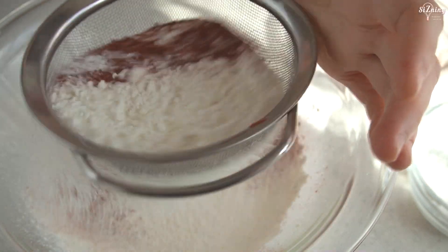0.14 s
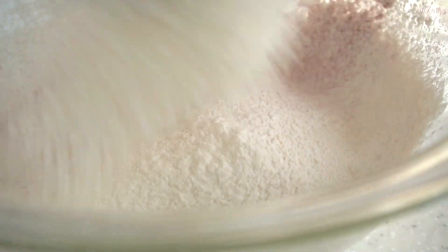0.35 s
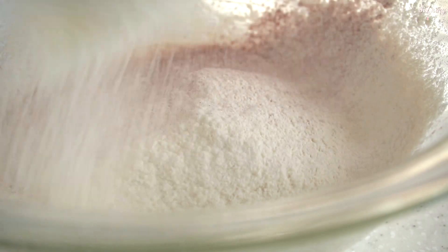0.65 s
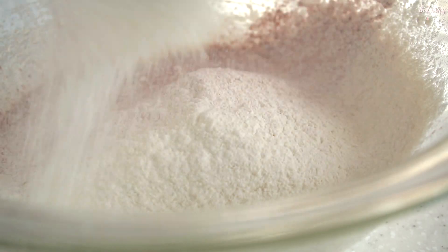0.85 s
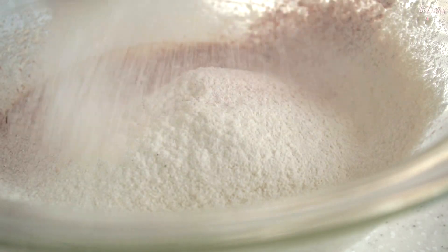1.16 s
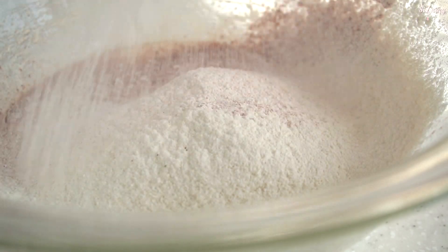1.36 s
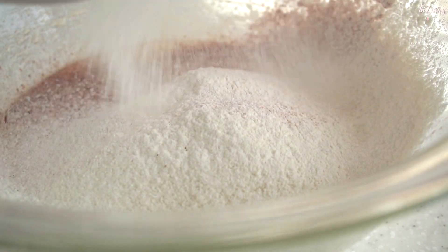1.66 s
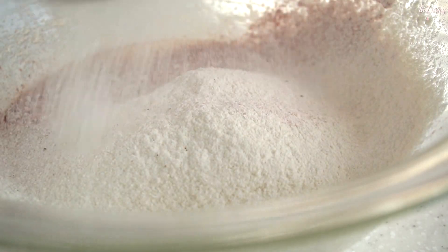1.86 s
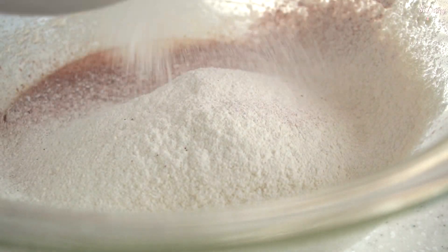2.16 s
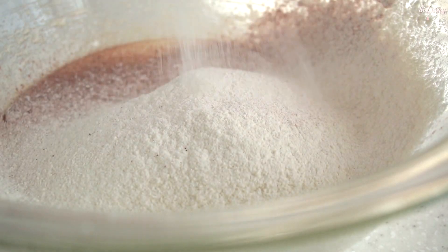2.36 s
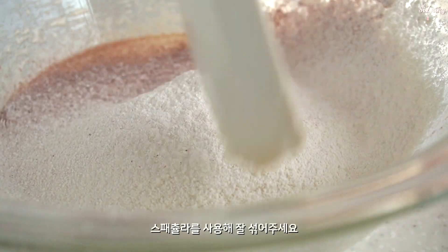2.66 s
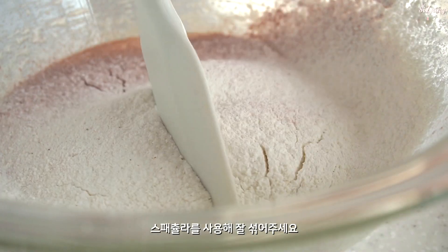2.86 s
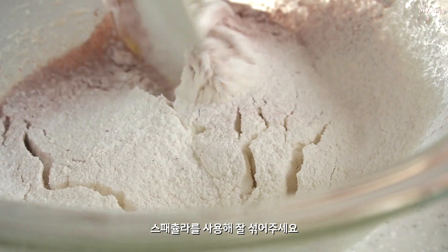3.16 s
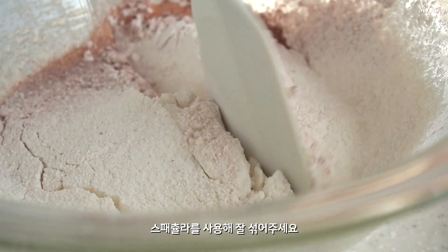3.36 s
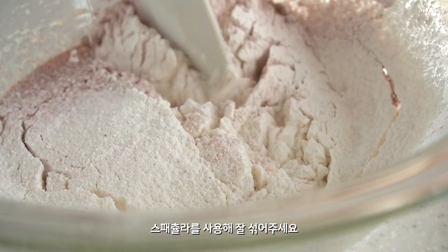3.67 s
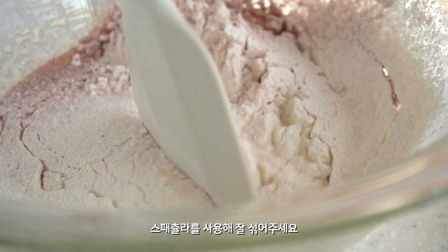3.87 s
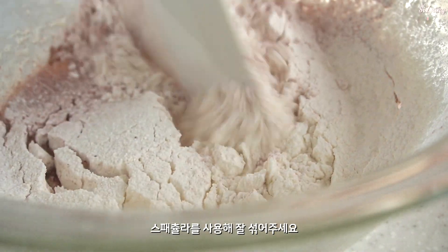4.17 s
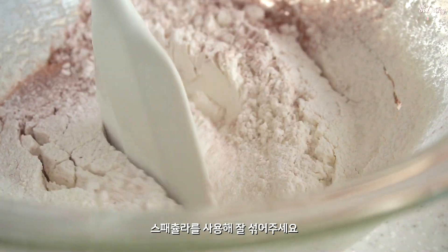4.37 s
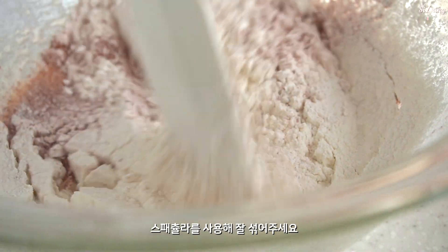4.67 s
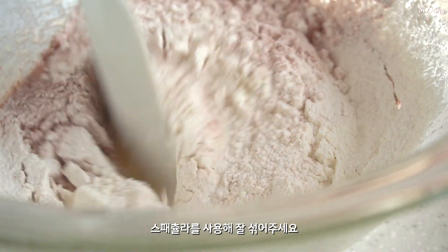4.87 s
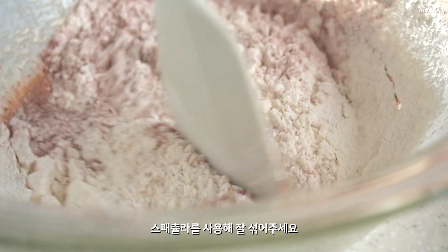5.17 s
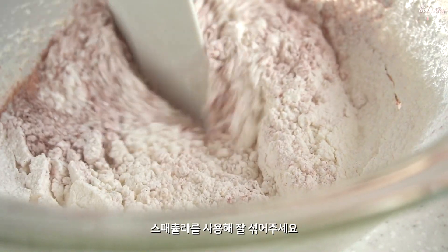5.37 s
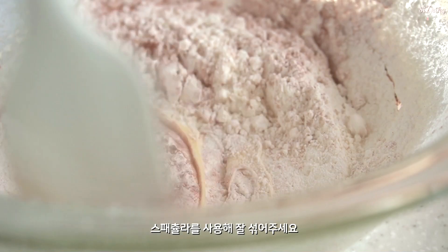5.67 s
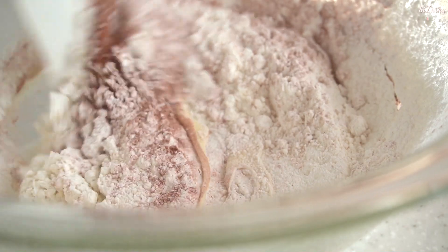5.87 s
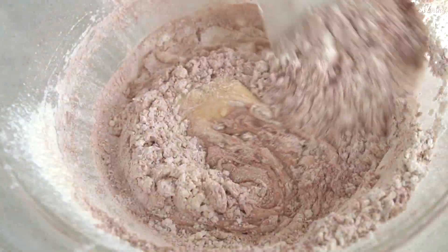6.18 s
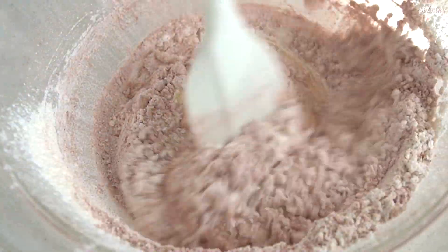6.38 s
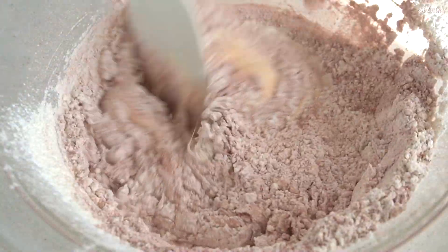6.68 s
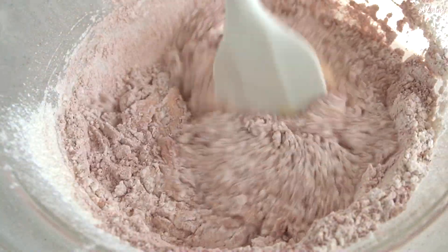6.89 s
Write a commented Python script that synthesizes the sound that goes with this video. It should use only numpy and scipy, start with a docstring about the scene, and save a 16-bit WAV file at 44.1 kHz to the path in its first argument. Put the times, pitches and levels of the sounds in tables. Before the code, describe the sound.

Flour hisses through a hand-knocked metal sieve in quick rhythmic bursts that thin out, then a spatula thuds, crunches and scrapes in a glass bowl.

```python
"""Sifting and stirring flour

A hand-knocked sieve sheds flour about six times a second until it empties: gated granular noise and modal jolts.
A spatula then chops and folds it in a glass bowl: struck modes thud and boom, grains crunch, stick-slip drags.
The blows also shake the stand of a close stereo microphone, by slowly decaying low modes.
Coloured noise below all this is the soft rumble and hiss of a quiet kitchen."""
import sys
import numpy as np
from scipy import signal
from scipy.fft import rfft, irfft, next_fast_len
from scipy.io import wavfile

SR = 44100
rng = np.random.default_rng(int(sys.argv[2]) if len(sys.argv) > 2 else 0)


def unload_audio(sound):
    """Save the sound as a 16-bit wav file, at the path given as the first command line argument."""
    columns = np.transpose(np.atleast_2d(sound))
    # keep every value between -1 and 1, then stretch to whole-number steps
    steps = np.round(np.clip(columns, -1, 1) * 32767)
    wavfile.write(sys.argv[1], SR, steps.astype(np.int16))


N = 310023
TIME = np.arange(N) / SR  # s

# sieve strokes, the frame stopping against the hand: (t/s, relative level/dB)
STROKES = [(0.154, -5.5), (0.324, -4.5), (0.497, -2), (0.672, -1), (.849, -1), (1.024, -0.5), (1.201, -0.5),
           (1.377, -1), (1.557, -2.5), (1.729, -3), (1.899, -3), (2.072, -1.5), (2.247, 1.5)]
# modes shaken by a stroke: (f/Hz, t60/s, build-up/s, relative level/dB, direction/rad)
# direction 0 moves both capsules alike, 1.57 moves them against each other
JOLT_MODES = [(23.9, 0.16, 0.0047, -27, 1.18), (41.8, 0.15, 0.0013, -25.5, 1.06),
              (145, 0.035, 0.0012, -31.5, 0.15), (228, 0.064, 0.012, -33.5, 0.066)]
# spectrum of flour passing the mesh: (f/Hz, relative level/dB)
MESH_SPECTRUM = [(900, -9), (2000, -2.5), (3200, -4), (4500, 2.5), (7000, -4), (10000, 1.5), (12500, -4),
                 (15500, -20)]
# the flow grows while the flour spreads, then dies away as the sieve empties
FLOW_DB, FULL_FLOW_S, SPREAD_DB_PER_S, EMPTY_DB_PER_S = -57, 0.67, 15, 14
# the loose heap topples across the mesh at the first stroke
HEAP_S, HEAP_WIDTH_S, HEAP_DB = 0.1624, 0.0065, -59


def sieve(lead_s=0.025, slide_s=0.021, back_s=0.044, settle_s=0.019, back_db=-4.0,
          land_s=0.0024, land_db=-57):
    """Granular flow gated by inertia: flour slides, the frame stops at the hand, flour is thrown back."""
    jolts = np.zeros((2, N))
    landing = np.zeros(N)
    flow = undb(HEAP_DB) * swell(HEAP_S, HEAP_WIDTH_S)
    jolt = ring(JOLT_MODES, contact_s=0.0045)
    for s, db in STROKES:
        add(jolts, s, undb(db) * jolt)
        spreading_loss = SPREAD_DB_PER_S * (FULL_FLOW_S - s)
        emptying_loss = EMPTY_DB_PER_S * (s - FULL_FLOW_S)
        flow_db = FLOW_DB - max(spreading_loss, emptying_loss)
        slide = swell(s - lead_s, slide_s)
        throw_back = undb(back_db) * swell(s + back_s, settle_s)
        flow += undb(flow_db) * (slide + throw_back)
        landing += undb(db + land_db) * swell(s, land_s)  # the mesh rasps briefly as the frame lands
    hiss = unit(shape(grains(per_second=15000, scatter_db=-2.0), MESH_SPECTRUM))
    rasp = unit(band(grains(per_second=9700, scatter_db=0.2), hz=5800, q=0.5))
    return jolts + spread(flow * hiss + landing * rasp, side_db=-8, pan_db=1.5)


# the sieve frame rubs in the hand: (t/s, length/s, f/Hz, rasp level/dB, handle groan level/dB)
RUBS = [(0.124, 0.074, 760, -61.5, -55.5), (0.308, 0.025, 750, -55, -57), (1.42, 0.022, 1010, -59, -75),
        (1.612, 0.061, 1100, -66.5, -82)]
HANDLE_HZ = 298


def rubs(rasp_q=1.96, groan_q=7):
    """Friction excites resonances: short dull creaks, with a handle groan while the sieve is heavy."""
    out = 0
    for s, length, hz, rasp_db, groan_db in RUBS:
        friction = rng.standard_normal((2, N))
        rasp = unit(band(band(friction, hz, rasp_q), hz, rasp_q))
        groan = unit(band(band(friction, HANDLE_HZ, groan_q), HANDLE_HZ, groan_q))
        creak = undb(rasp_db) * rasp + undb(groan_db) * groan
        out = out + swell(s, length / 2) * creak
    return spread(out, side_db=-13, pan_db=4.5)


# spatula blows: (t/s, bowl knock level/dB, contact/s, counter boom level/dB, slow stand sway level/dB)
BLOWS = [(2.856, -10, 0.0044, -3.5, -10.5), (3.091, 0.5, 0.0031, -8.5, -19),
         (3.368, -1, 0.0093, -22, -18.5), (3.396, 1, 0.0049, 0.5, -14), (3.904, 0.5, 0.005, 2, -7.5),
         (4.096, -5, 0.0034, -13.5, -13.5), (4.348, -4.5, 0.0041, 0.5, -8), (4.79, -1.5, 0.0037, 2, -7),
         (4.955, -4, 0.0031, -13.5, -36), (5.209, 1, 0.0052, 0, -3), (5.546, -22.5, 0.0024, -29, -20),
         (5.887, -17.5, 0.0023, -23, -26), (6.172, -18.5, 0.0051, -20.5, -18.5),
         (6.395, -11.5, 0.0029, -36, -26.5), (6.581, -2, 0.0089, -10, -17),
         (6.915, -12.5, 0.0026, -25, -31)]
# modes of bowl, microphone stand and counter:
# (f/Hz, t60/s, build-up/s, relative level/dB, direction/rad as for the jolts)
BOWL_MODES = [(142, 0.029, 0.0012, -21, -0.029), (186.5, 0.033, 0.00032, -24.5, -0.089),
              (222, 0.11, 0.00054, -43.5, 0.0018), (662, 0.034, 0.00069, -15, 0)]
STAND_MODES = [(20.85, 1.87, 0.011, -17.5, 1), (31.77, 2.56, 0.41, -11, -1.456),
               (38.89, 1.4, 0.006, -24.5, -0.46)]
COUNTER_MODES = [(72.8, 0.31, 0.00098, -20, 0.29), (67.8, 0.46, 0.13, -6, -1.59),
                 (96.5, 0.26, 0.089, -12, 1.56)]


def thuds():
    """Impact excitation of modes: the bowl knocks, the counter booms and the microphone stand rocks."""
    knocks, lows = np.zeros((2, N)), np.zeros((2, N))
    boom = ring(COUNTER_MODES, contact_s=0.0039)
    sway = ring(STAND_MODES, contact_s=0.012)
    for s, knock_db, contact_s, boom_db, sway_db in BLOWS:
        add(knocks, s, undb(knock_db) * ring(BOWL_MODES, contact_s))
        add(lows, s, undb(boom_db) * boom + undb(sway_db) * sway)
    return room(knocks, wet_db=-8.5, t60_s=0.22) + room(lows, wet_db=-15.5, t60_s=0.81)


# spectrum of the crushed powder: (f/Hz, relative level/dB)
POWDER_SPECTRUM = [(400, -31), (1100, 13), (2300, 4.5), (4600, 3.5), (5700, 3), (6600, -5), (8000, -2),
                   (10000, 0), (12000, -12), (15500, -32)]
# glass resonances that the scraping excites: (f/Hz, Q, relative level/dB)
WALL_RESONANCES = [(2690, 4.5, -18.5), (4450, 4.1, -24), (5730, 80, -21.5), (9600, 28, -31.5),
                   (11100, 30, -23)]


def crunch(glass_db=4, patchy_db=2.5, wander_db=3, lumps_db=-7.0, crumble_s=0.0031):
    """Granular fracture: packed flour yields in grains and lumps, coloured by glass as the blade moves."""
    # each lump breaks as a tiny puff rather than a click
    breaks = np.abs(grains(per_second=420, scatter_db=0.8)[:1])
    puffs = signal.lfilter([1], [1, -np.exp(-1 / (crumble_s * SR))], breaks)
    lumps = unit(band(puffs * rng.standard_normal((2, N)), hz=2830, q=0.49))
    grit = grains(per_second=9000, scatter_db=3.5) + undb(lumps_db) * lumps
    glass = 0
    for hz, q, db in WALL_RESONANCES:
        wandering_gain = undb(db + wander_db * walk(rate=7.3))
        glass = glass + wandering_gain * unit(band(grit, hz, q))
    powder = unit(shape(grit, POWDER_SPECTRUM))
    sound = unit(powder + undb(glass_db) * glass)
    patches = undb(patchy_db * walk(rate=90))
    return spread(pressure() * patches * sound, side_db=-11.5, pan_db=2.0)


# spectrum of the juddering bowl: (f/Hz, relative level/dB)
BOWL_SPECTRUM = [(60, -11), (130, 5.5), (220, 4), (340, -4.5), (650, -5), (1200, -25), (4000, -46)]
# the rasp sinks from its top pitch as the blade bends, passing RASP_HZ at RASP_AT_S
RASP_TOP_HZ, RASP_HZ, RASP_AT_S, SINK_OCTAVES_PER_S = 4690, 1558, 6.0, 6.6
# in the last fold the flat of the blade judders over the bottom of the bowl
FOLD_S, FOLD_WIDTH_S, FOLD_DB = 6.9, 0.04, -57.5


def drag(q=1.64, patchy_db=1.5, judder_db=2, judder_db_per_octave=-7):
    """Stick-slip friction: as the blade bends, its resonance sinks and the bowl judders more."""
    top_octaves = np.log2(RASP_TOP_HZ / RASP_HZ)
    octaves = np.clip(SINK_OCTAVES_PER_S * (RASP_AT_S - TIME), -2, top_octaves)
    slips = unit(band(band(grains(per_second=4300, scatter_db=2.0), RASP_HZ, q), RASP_HZ, q))
    # reading the slips ever more slowly lowers both their resonance and their rate
    travel = np.cumsum(2 ** octaves) % (N - 1)
    rasp = np.array([np.interp(travel, np.arange(N), part) for part in slips])
    rasp = rasp * undb(patchy_db * walk(rate=70))
    body = unit(shape(grains(per_second=1000, scatter_db=2.0), BOWL_SPECTRUM))
    friction = sweep_gains()[1]
    judder = undb(judder_db + judder_db_per_octave * octaves) * friction
    judder = judder + undb(FOLD_DB) * swell(FOLD_S, FOLD_WIDTH_S)
    return spread(friction * rasp + judder * body, side_db=-13, pan_db=2)


# the blade pushes through the powder after a chop: (t/s, length/s, level/dB)
PUSHES = [(2.862, 0.11, -67.5), (3.047, 0.044, -65), (3.423, .06, -69.5), (3.97, 0.066, -60.5),
          (4.402, 0.062, -62.5), (4.791, 0.13, -63.5), (5.262, 0.051, -65), (6.655, 0.026, -60.5),
          (6.79, .11, -69)]
PUSH_ATTACK_S, PUSH_RELEASE_S = 0.015, 0.062
# between pushes the blade keeps rustling in the powder
STIR_START_S, STIR_DB = 2.48, -75


def pressure():
    """Power summation of the blade's work: steady stirring, single pushes and the long sweep."""
    stirring = undb(STIR_DB) * (TIME > STIR_START_S)
    gains = [stirring, sweep_gains()[0]]
    for s, length, db in PUSHES:
        gains.append(undb(db) * burst(s, PUSH_ATTACK_S, length, PUSH_RELEASE_S))
    return np.sqrt(sum(gain ** 2 for gain in gains))


# one long sweep of the blade round the wall: (t/s, powder crunch level/dB, glass rasp level/dB)
SWEEP = [(5.452, -80, -93), (5.68, -68, -70), (5.83, -61.5, -65.5), (5.92, -62, -67.5), (5.98, -70, -60),
         (6.08, -70.5, -61.5), (6.14, -57.5, -67.5), (6.201, -63.5, -62.5), (6.25, -81, -94)]


def sweep_gains():
    """Friction envelopes interpolated in decibels: the crunch and the rasp along the sweep."""
    s, *levels = np.transpose(SWEEP)
    return [undb(np.interp(TIME, s, db, left=-120, right=-120)) for db in levels]


# the blade's edge ticks on the glass: (t/s, level/dB, brightness f/Hz)
TICKS = [(2.4874, -41, 1530), (2.883, -55.5, 3200), (2.964, -52.5, 3000), (4.035, -56, 4400),
         (4.373, -51, 1100), (4.428, -46.5, 2800), (4.814, -45.5, 1720), (4.827, -55, 4100),
         (4.838, -46, 2880), (5.2323, -47.5, 1510), (5.548, -55, 740), (5.842, -52, 3430),
         (5.946, -52.5, 6100), (6.3963, -59, 800)]
# the blade grazes the bowl and it sings faintly: (t/s, fading/s, f/Hz, level/dB)
GLASS_TONES = [(2.62, 0.19, 4092, -71.5), (3.364, .025, 4092, -72), (5.278, .016, 5760, -71)]


def blade_ticks(graze_s=0.01):
    """Impulsive contact and modal singing: dry ticks, and faint glass tones of wavering pitch and level."""
    out = np.zeros((2, N))
    for s, db, hz in TICKS:
        add(out, s, undb(db) * tick(hz))
    for s, fading_s, hz, db in GLASS_TONES:
        wavering_hz = hz + 14 * walk(rate=160)
        tone = np.sin(2 * np.pi * np.cumsum(wavering_hz) / SR)
        wavering_gain = undb(db + 3.0 * walk(rate=18))
        out[0] += wavering_gain * burst(s, graze_s, graze_s, fading_s) * tone
    return spread(out, side_db=-8, pan_db=0.5)


def tick(hz, q=0.57, scatter_db=-16, scatter_s=0.014, body_db=-6):
    """Impulse response of a contact and its scatter; below 1500 Hz the bowl's body sounds fully."""
    t = TIME[:SR // 16]
    noise = rng.standard_normal((2, len(t)))
    hit = undb(scatter_db) * noise * np.exp(-t / scatter_s) * np.sqrt(hz / SR * 2)
    hit[0, 0] += 1
    snap = unit(band(band(hit, hz, q), hz, q))
    body = unit(band(hit, hz=750, q=7.2) + band(hit, hz=1200, q=7.1))
    sound = snap + undb(body_db) * min(1500 / hz, 1) * body
    return sound * np.sqrt(0.00079 / t[-1])  # about rms 1 over the contact


# spectrum of the quiet room: (f/Hz, relative level/dB)
KITCHEN_SPECTRUM = [(12, -29), (20, 15.5), (59, 6.5), (196, -3.5), (259, 1), (298, -6), (333, -6),
                    (393, -8), (519, -6.5), (1380, -18.5), (1500, -18.5), (2330, -24), (4070, -27),
                    (5230, -28), (15500, -32)]
# stereo width of the room: (f/Hz, side minus mid level/dB)
KITCHEN_WIDTH = [(60, 5), (110, -9), (200, -5.5), (1300, -3), (4400, -2), (15000, 0)]


def kitchen(level_db=-53.84, waver_db=-0.66):
    """Stationary diffuse noise: room rumble and hiss, wide in the bass and wavering slightly in level."""
    mid, side = shape(rng.standard_normal((2, N)), KITCHEN_SPECTRUM)
    noise = stereo(unit(mid), shape(unit(side), KITCHEN_WIDTH))
    return noise * undb(level_db + waver_db * walk(rate=1.99))


def room(x, wet_db, t60_s):
    """Exponential reverberant decay: adds the short diffuse echo of the kitchen."""
    t = TIME[:SR // 2]
    decay = np.exp(-np.log(1000) * t / t60_s)
    build_up = 1 - np.exp(-t / 0.016)
    tail = rng.standard_normal((2, len(t))) * decay * build_up
    tail = stereo(tail[0], undb(-7) * tail[1]) / np.sqrt(np.sum(tail[0] ** 2))
    return x + undb(wet_db) * signal.fftconvolve(x.mean(axis=0)[None], tail, axes=1)[:, :N]


def ring(modes, contact_s):
    """Modal superposition: damped modes answer one soft push; a longer contact dulls it."""
    t = TIME[:2 * SR]
    out = 0
    for hz, t60, build, db, direction in modes:
        decay = np.exp(-np.log(1000) * t / t60)
        motion = np.sin(2 * np.pi * hz * t) * decay * (1 - np.exp(-t / build))
        speed = np.diff(motion, prepend=0) * SR / (2 * np.pi * hz)
        out = out + undb(db) * stereo(np.cos(direction) * speed, np.sin(direction) * speed)
    push = np.sin(np.pi * np.minimum(t[:SR // 20] / contact_s, 1)) ** 2
    return signal.fftconvolve(out, push[None] / push.sum(), axes=1)


def grains(per_second, scatter_db):
    """Poisson-like impulse noise: two click streams at shared instants, with independent strengths."""
    present = rng.random(N) < per_second / SR
    size = undb(scatter_db * np.minimum(rng.exponential(size=N), 6))
    return unit(rng.standard_normal((2, N)) * present * size)


def walk(rate):
    """Slow random modulation: Gaussian values, rate per second, joined by straight lines."""
    knots = rng.standard_normal(2048)
    return np.interp(TIME * rate, np.arange(len(knots)), knots)


def swell(s, length):
    """Gaussian envelope: a smooth rise and fall around time s."""
    return np.exp(-np.minimum(((TIME - s) / length) ** 2, 100) / 2)


def burst(s, attack_s, length_s, release_s):
    """Attack-hold-release envelope: linear rise from time s, exponential fade after the length."""
    rise = np.clip((TIME - s) / attack_s, 0, 1)
    return rise * np.exp(-np.clip((TIME - s - length_s) / release_s, 0, 50))


def shape(x, points):
    """Linear filtering in the frequency domain: colours a sound by (f/Hz, level/dB) points."""
    hz, db = np.transpose(points)
    size = next_fast_len(N + 4096)
    bins = np.maximum(np.arange(size // 2 + 1) * SR / size, 1)
    gain = undb(np.interp(np.log(bins), np.log(hz), db))
    return irfft(rfft(x, size) * gain, size)[..., :N]


def band(x, hz, q):
    """Second-order resonance: one peak, limited in frequency and sharpness to stay stable."""
    return signal.lfilter(*signal.iirpeak(min(hz, SR / 4), max(q, hz / SR * 4), fs=SR), x)


def spread(pair, side_db, pan_db):
    """Mid-side imaging: two uncorrelated sounds become a direct sound and its scatter in the bowl."""
    pan = undb(np.array([[pan_db], [-pan_db]]) / 2)
    return stereo(pair[0], undb(side_db) * pair[1]) * pan


def stereo(mid, side):
    """Sum and difference: left and right from mid and side."""
    return np.array([mid + side, mid - side])


def add(out, s, sound):
    """Superposition: mixes a short sound in at time s."""
    start = max(int(s * SR), 0)
    part = sound[..., :N - start]
    out[..., start:start + part.shape[-1]] += part


def undb(db):
    """Logarithmic level: decibels to amplitude gain."""
    return 10 ** (np.asarray(db) / 20)


def unit(x):
    """Effective value: scales to rms 1."""
    return x / np.sqrt(np.mean(x ** 2))


def scene():
    """Superposition of sources: sifting, then stirring, in the quiet room."""
    return sieve() + rubs() + thuds() + crunch() + drag() + blade_ticks() + kitchen()


TOP_HZ = 15750


def record(dry):
    """Band limitation: the recorder's steep elliptic low-pass cuts the top."""
    return signal.sosfilt(signal.ellip(10, 0.1, 80, TOP_HZ, fs=SR, output="sos"), dry)


dry = scene()
out = record(dry)
unload_audio(out)
```